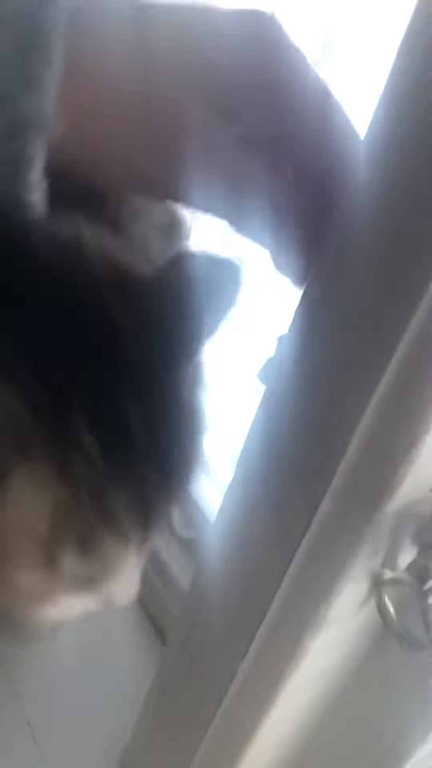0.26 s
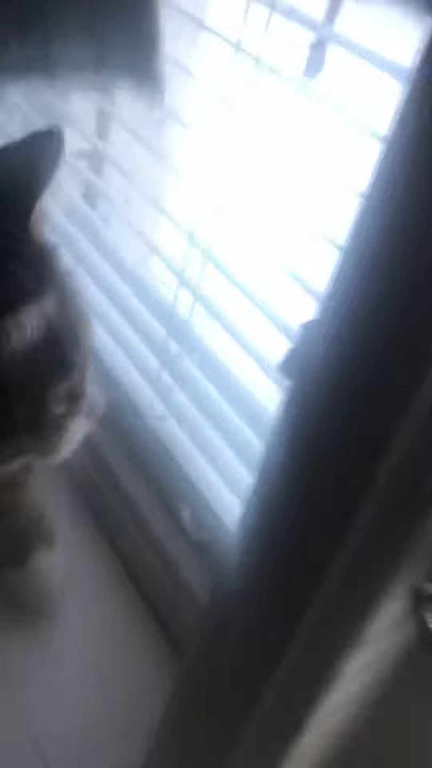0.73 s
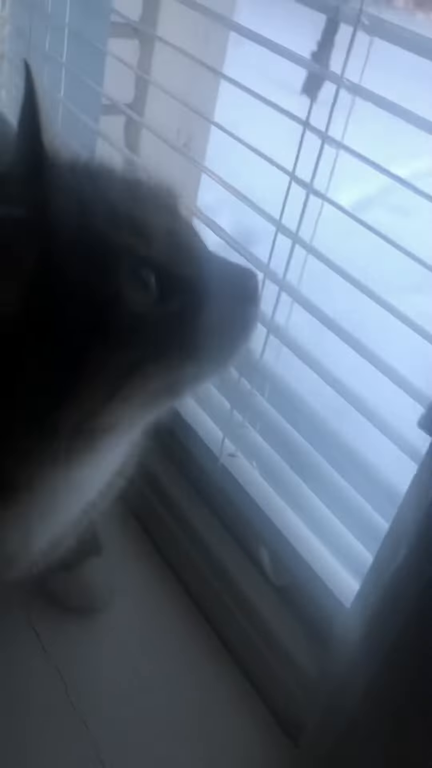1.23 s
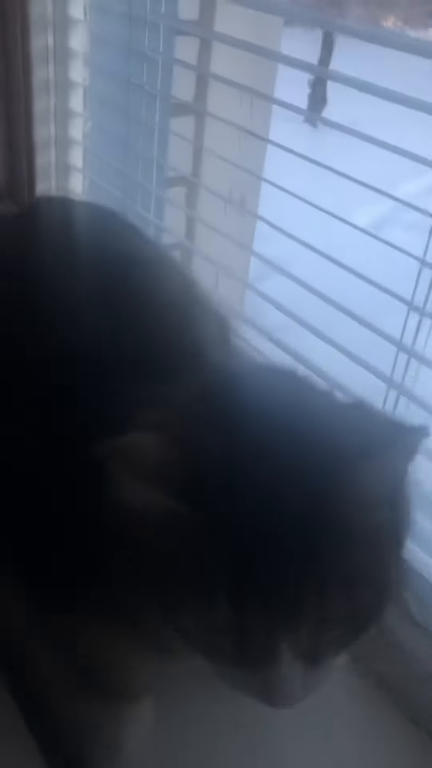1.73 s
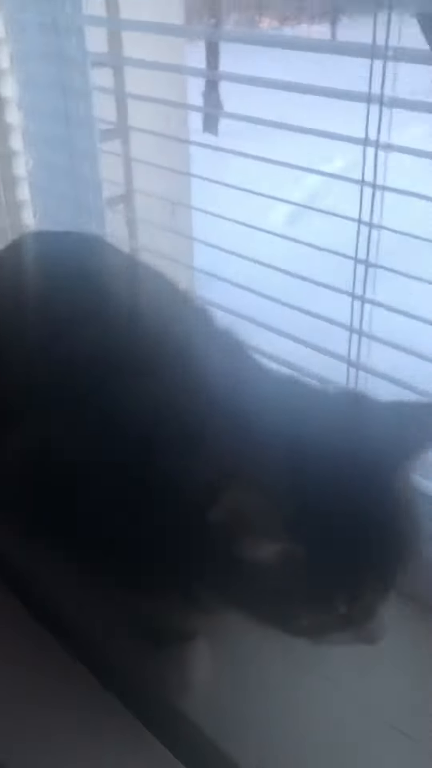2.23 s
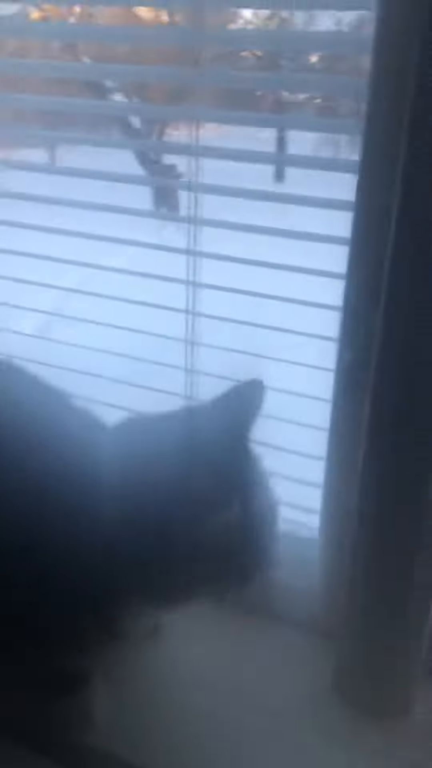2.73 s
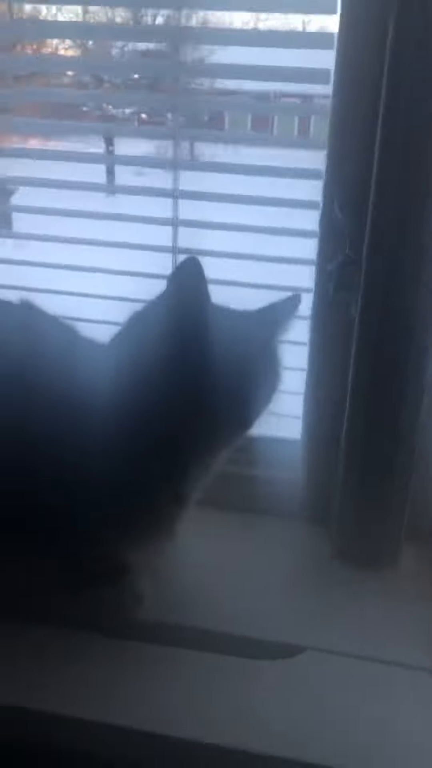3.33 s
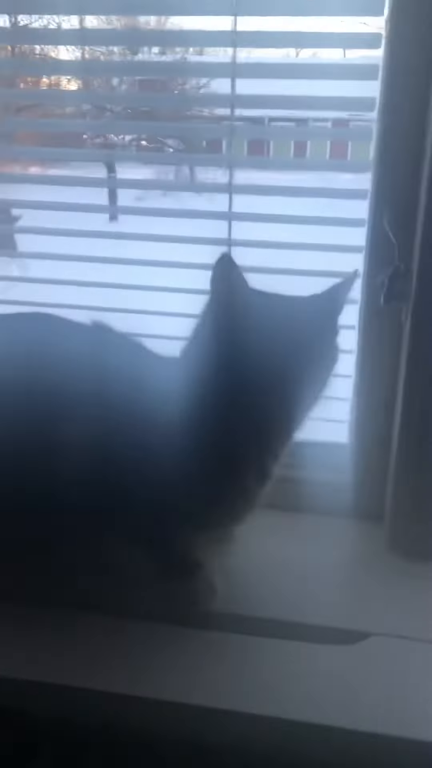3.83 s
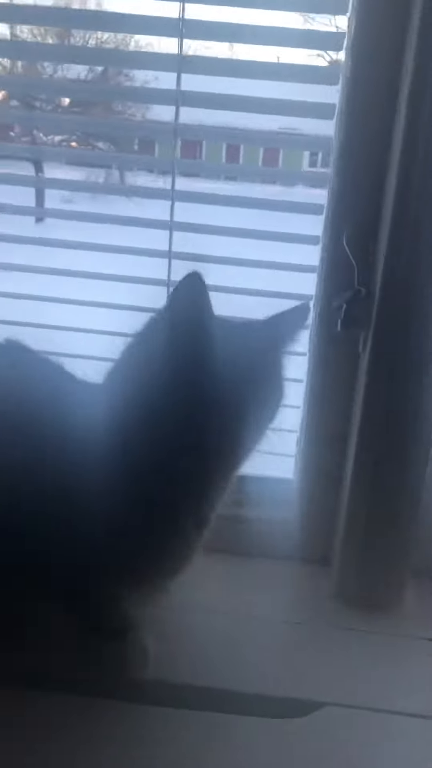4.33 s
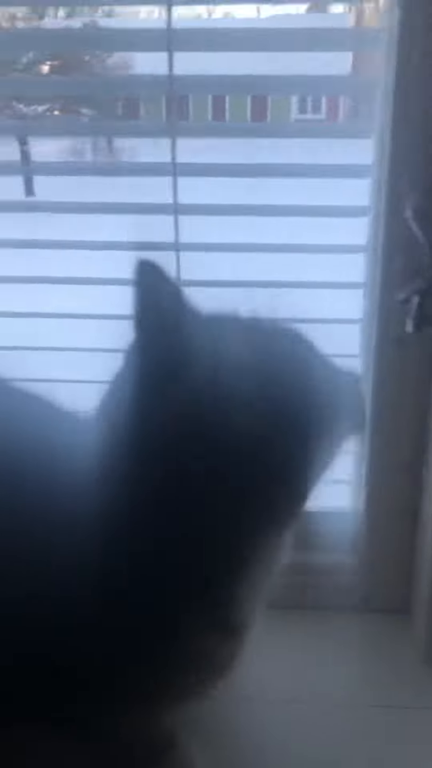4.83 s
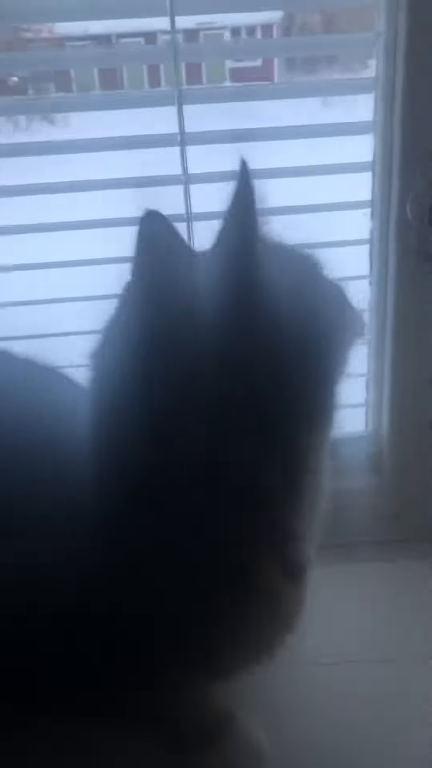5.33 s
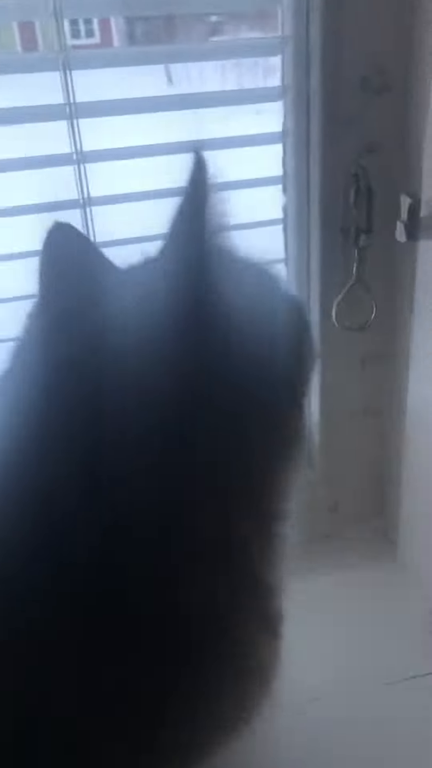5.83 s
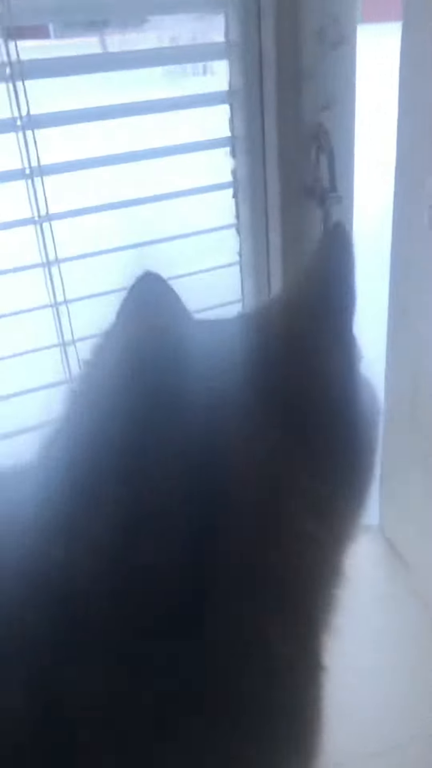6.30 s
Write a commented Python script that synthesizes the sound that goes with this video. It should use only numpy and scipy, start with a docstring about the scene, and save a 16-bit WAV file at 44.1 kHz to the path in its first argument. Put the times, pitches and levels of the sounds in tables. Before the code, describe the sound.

A window sash clacks shut with a metallic slat rattle, quiet fur rustles and small ticks follow, then a latch is worked loose with hard clattering knocks.

```python
"""A cat shifts on the sill of a window with slatted blinds, in a quiet room, close to a hand-held phone.
All along there are room hum and rustling fur and cloth, both made of shaped noise. At first the sash clacks
shut: noise bursts knock, loose slats rattle and the handle rings on as slowly fading tones. Small ticks and
dull, sagging thuds follow. From 5 s the metal latch is worked loose, with harder knocks, rattle, ringing
and a tiny squeak; then fur and cloth rustle again and soft thuds end it."""
import sys
import numpy as np
from scipy import signal
from scipy.fft import rfft, irfft
from scipy.io import wavfile
from scipy.ndimage import uniform_filter1d

SR = 44100
rng = np.random.default_rng(int(sys.argv[2]) if len(sys.argv) > 2 else 0)


def attenuation_scalar(level_db):
    """Turn a level in dB into a linear amplitude multiplier (20 dB per decade)."""
    decades = np.asarray(level_db, float) / 20
    return 10 ** decades


def bounce(signal):
    """Save signal as a 16-bit WAV file at the path given by the first command-line argument."""
    frames = np.transpose(np.atleast_2d(signal))
    limited = np.clip(frames, -1, 1)
    pcm = np.round(limited * 32767).astype(np.int16)
    wavfile.write(sys.argv[1], SR, pcm)


N = 289296  # length in samples
BINS = np.fft.rfftfreq(4096, 1 / SR)  # frequencies in Hz at which the knocked parts are described

# Knocks of latch, slats and claws. Each row: start in seconds, peak rms level of the slats in dB,
# main resonance in Hz, time to fade by 60 dB in seconds (.004 at least), treble against the slats in dB.
KNOCKS = [(0.1649, -44.5, 2460, .064, -12), (0.2681, -47.5, 3530, 0.023, -19.5),
          (0.2748, -36.5, 3300, 0.05, -29), (0.2915, -42.5, 2100, 0.076, -26),
          (0.3018, -43.5, 1020, 0.03, -25), (0.318, -51.5, 7800, .023, -24),
          (0.3975, -42.5, 3190, .059, -18.5), (0.411, -13.5, 3700, 0.023, -15),
          (0.4154, -23.5, 1770, 0.037, -26), (0.446, -24.5, 2908, 0.054, -18),
          (0.4749, -38, 3409, 0.11, -19), (0.5188, -39, 4230, 0.028, -40.5),
          (0.8119, -53, 1085, 0.079, -20.5), (0.9361, -60.5, 2980, 0.036, -13),
          (1.9744, -62, 3970, .072, -13), (2.0001, -57, 6080, .016, -9.5), (3.071, -64.5, 1064, 0.042, -25),
          (3.0949, -58.5, 2260, .0094, -3.5), (3.138, -51, 2760, 0.012, -11.5),
          (3.1957, -50, 2020, 0.0031, -27), (3.2926, -52.5, 4250, 0.0097, -10),
          (3.3, -58.5, 1400, .02, -19), (3.4262, -60, 1290, 0.02, -8), (3.568, -60, 1280, 0.031, -11),
          (3.738, -67, 1290, .077, -22), (4.5477, -55, 3550, 0.0044, -4), (5.018, -38, 3690, 0.062, -8.5),
          (5.029, -43, 1857, 0.062, 5.5), (5.0642, -31, 3300, 0.16, -11.5),
          (5.0709, -27.5, 2100, 0.0057, -1), (5.0767, -29, 1560, 0.0079, 4),
          (5.0878, -32, 2410, 0.058, -12), (5.0985, -33.5, 3980, 0.014, 2.5),
          (5.1114, -39, 3630, 0.086, -2.5), (5.1372, -33.5, 3120, 0.047, -6.5),
          (5.1592, -28, 7700, 0.037, -5), (5.1886, -22, 965, 0.062, -3.5),
          (5.2149, -24.5, 1000, 0.045, -14), (5.2233, -28.5, 1084, .026, -6),
          (5.2425, -38, 1019, 0.026, 1.5), (5.3146, -24, 7400, 0.024, 1), (5.3284, -48, 4125, 0.035, -2),
          (5.3707, -36.5, 7600, .015, -7.5), (5.3947, -27, 7540, 0.02, -3.5), (5.3983, -30, 5400, 0.02, -1),
          (5.4254, -31, 7610, 0.017, -4), (5.435, -13, 5860, 0.016, -9.5), (5.4392, -19, 8550, 0.042, -1),
          (5.4526, -26, 7545, 0.11, -0.5), (5.4652, -30, 3940, 0.047, -1), (5.4805, -27.5, 7460, 0.043, -2),
          (5.4957, -59.5, 4046, 0.04, -6.5), (5.623, -51.5, 980, 0.028, -30.5),
          (5.637, -47.5, 990, 0.0093, -15), (5.6643, -36, 1070, 0.04, -24),
          (5.6757, -53, 1130, .056, -28.5)]


def evened(x):
    """Scales a sound to rms 1, so that its level can be set afterwards."""
    return x / np.sqrt(np.mean(x ** 2) + 1e-20)


def read(points, hz):
    """Reads a table of (Hz, value) at the frequencies hz, along a logarithmic frequency scale."""
    f, value = np.transpose(points)
    return np.interp(np.log(hz + 1), np.log(f), value)


def add(mix, s, sound):
    """Mixes a sound in at s seconds, cutting off what runs past the end."""
    part = mix[round(s * SR):][:len(sound)]
    part += sound[:len(part)]


def noise(spectrum, patchy_db, flicker_db):
    """Noise of rms 1 with drifting louder patches and a flicker shared by all frequencies."""
    frames = N // 128 + 5
    real, imaginary, patches = rng.standard_normal((frames, 257, 3)).T
    patches = uniform_filter1d(patches, size=10, axis=0)  # spread over frequency
    patches = evened(uniform_filter1d(patches, size=20, axis=1))  # spread over time
    flicker = evened(uniform_filter1d(rng.standard_normal(frames), size=4))
    cells = (real + 1j * imaginary) * attenuation_scalar(patchy_db * patches + flicker_db * flicker)
    white = signal.istft(cells, nperseg=512, noverlap=384)[1][:N]
    color = attenuation_scalar(read(spectrum, np.fft.rfftfreq(N, 1 / SR)))
    return evened(irfft(rfft(white) * color, N))


def room_tone():
    """The steady hum of the room: faint noise, strongest in the bass."""
    # Spectrum of the hum. Each row: frequency in Hz, relative level in dB.
    hum = [(18, -36.5), (30, -8.5), (60, 0), (166, 1), (247, -12), (289, -7.5), (787, -14.5), (11600, -30),
           (15100, -28), (16300, -39)]
    return attenuation_scalar(-68) * noise(hum, patchy_db=1.2, flicker_db=0.5)


def stir():
    """Fur, cloth and hand rub as rumble, rustle and fine hiss; each stroke swells and fades."""
    # Movement near the phone. Each row: time in seconds, rumble rms in dB, rustle rms in dB
    # (strokes are added on top).
    movement = [(0, -60, -65.5), (.09, -61, -70.5), (.55, -52, -61.5), (.8, -65, -68.5),
                (1.051, -68, -79.5), (1.92, -73, -82.5), (2.1, -63, -67), (2.45, -74, -71),
                (2.9, -66.5, -67), (3.039, -66, -79), (3.2, -64.5, -72.5), (3.45, -66.5, -79),
                (3.9, -69.5, -69), (4.3, -80, -78.5), (4.781, -71.5, -80), (4.86, -48.5, -70.5),
                (4.93, -59.5, -67), (5.049, -55, -63), (5.72, -48, -55), (5.9, -50, -60.5), (6.1, -60, -70),
                (6.3, -60, -79), (6.56, -68, -77)]
    # Single strokes. Each row: start in seconds, length in seconds, rustle rms in dB before a cut of 6 dB,
    # fine hiss rms in dB.
    strokes = [(0.081, 0.097, -61.5, -67.5), (0.224, 0.055, -82, -65), (0.342, 0.075, -68, -62),
               (0.556, 0.14, -84, -65.5), (0.651, 0.19, -67.5, -66), (0.826, 0.16, -68.5, -78.5),
               (1.931, 0.13, -65.5, -73), (2.479, 0.14, -61.5, -98), (2.65, 0.15, -66, -76.5),
               (2.9, 0.056, -72, -80.5), (3.11, .13, -60, -68.5), (3.254, 0.072, -69.5, -79.5),
               (3.554, 0.1, -73.5, -82), (3.707, 0.088, -74, -76), (3.838, 0.071, -68, -74.5),
               (4.151, 0.097, -65, -85.5), (4.633, 0.26, -81.5, -77), (4.814, 0.069, -59, -84),
               (5.7, 0.51, -72, -74.5), (6.321, 0.17, -67, -97)]
    # Spectra of the three noises. Each row: frequency in Hz, relative level in dB.
    rumble_color = [(30, -43), (55, -3.5), (100, -5.5), (160, -0.5), (300, -5.5), (500, -17), (1000, -37.5),
                    (2000, -46.5)]
    rustle_color = [(100, -20), (400, 8), (1000, -3), (3000, -8), (6000, -13), (12000, -26.5), (16000, -33)]
    hiss_color = [(2000, -31.5), (6000, -1), (10000, -6), (15500, -2.5), (16300, -1)]

    s, *levels_db = np.transpose(movement)
    rumble, rustle = (attenuation_scalar(np.interp(np.arange(N) / SR, s, db)) for db in levels_db)
    hiss = np.full(N, attenuation_scalar(-86))  # never quite silent
    for start, length, rustle_db, hiss_db in strokes:
        swell = signal.windows.tukey(round(length * SR), .7)
        add(rustle, start, attenuation_scalar(rustle_db - 6) * swell)
        add(hiss, start, attenuation_scalar(hiss_db) * swell)
    return (rumble * noise(rumble_color, 0.84, 0.83)
            + rustle * noise(rustle_color, 4.2, 1.8)
            + hiss * noise(hiss_color, 1.5, 2.0))


def causal(gain):
    """The impulse response with this gain per frequency that starts at once (minimum phase)."""
    log_gain = np.log(np.r_[gain, gain[-2:0:-1]] + 1e-5)
    return np.fft.ifft(np.exp(np.conj(signal.hilbert(log_gain)))).real[:2048]


def band(lo_hz, hi_hz):
    """Gain of a band-pass with steep sides."""
    return 1 / np.sqrt((1 + (lo_hz / (BINS + 1)) ** 8) * (1 + (BINS / hi_hz) ** 8))


def peaks(modes, reach=1):
    """Gain of resonant peaks over a flat response; reach says how well a blow finds each mode."""
    total_db = 0
    for (hz, width, _), height_db in zip(modes, np.transpose(modes)[2] * reach):
        total_db = total_db + height_db / (1 + ((BINS - hz) / (abs(width) / 2)) ** 2)
    return attenuation_scalar(total_db)


def bodies(main_hz, treble_db=-8):
    """Impulse responses of the slats (one patch loudest), of the hollow sash and of the bright edges."""
    # What rings in the slats and edges. Each row: frequency in Hz, width in Hz, height in dB at a reach of 1.
    slat_modes = [(1814.5, 60, 7.5), (2270, 110, 7), (2920, 130, 1), (3816, 150, 7.5), (4200, 35, 6),
                  (5610, 95, 6.5), (6310, 100, 8), (7600, 150, 8), (8420, 300, 5.5), (12350, 230, 6)]
    # Hollow modes of the sash and pane. Each row: frequency in Hz, width in Hz, height in dB.
    sash_modes = [(161.8, 18, 5.5), (289, 99, 7.5), (424.3, 75, 7.5), (591.5, 180, 6), (1140, 130, 2)]

    patch = 0.25 + 1 / np.hypot(1, (BINS - main_hz) / (0.11 * main_hz))
    near = 1 / np.hypot(1, (np.transpose(slat_modes)[0] - main_hz) / (0.1 * main_hz))
    reach = rng.random(len(slat_modes)) + 0.58 * near  # every blow lands on another spot
    metal = peaks(slat_modes, reach)
    blunt = np.hypot(1, BINS / (main_hz + 11000 * attenuation_scalar(treble_db)))  # a blunt blow is dull
    slats = band(800, 7500) * patch * metal / blunt
    sash = band(91, 1000) * peaks(sash_modes)
    edges = band(6800, 17000) * metal
    return causal(slats), causal(sash), causal(edges)


def rattle():
    """Small uneven contacts wander over the slats after each knock, while the heavy sash shudders."""
    # Shudder of the sash in its frame: one list while it is shut, one while it is opened.
    # Each row: time in seconds, rms level in dB.
    shudder = [
        [(.16, -48), (.19, -50), (.25, -68), (.3, -48.5), (.39, -64), (.435, -46), (.5, -51.5), (.6, -68)],
        [(5.012, -60.5), (5.06, -56), (5.095, -42.5), (5.15, -52.5), (5.235, -33.5), (5.305, -48.5),
         (5.345, -35), (5.39, -56), (5.45, -33.5), (5.52, -45), (5.6, -68), (5.655, -70), (5.68, -41.5),
         (5.8, -60), (5.92, -71)],
    ]
    # Chatter of loose slats after a knock of -40 dB, and its growth in dB for each dB of the knock.
    chatter_db, growth = -52.5, 0.7349
    rise_s, slat_t60, edge_t60 = 0.0055, 0.21, 0.13  # seconds; the treble settles sooner

    t = np.arange(N) / SR
    # The rattle is heard only within the two spans of the shudder.
    moving = sum(1. * (t > span[0][0]) * (t <= span[-1][0]) for span in shudder)
    moving = uniform_filter1d(moving, size=800)

    after = t[:SR // 2]
    rise = np.minimum(after / rise_s, 1)
    slat_settle = (rise * attenuation_scalar(-60 * after / slat_t60)) ** 2
    edge_settle = (rise * attenuation_scalar(-60 * after / edge_t60)) ** 2
    dull, bright = np.zeros((2, N))  # power of the chatter
    for s, db, _, _, treble_db in KNOCKS:
        power = attenuation_scalar(chatter_db + growth * (db + 40)) ** 2
        add(dull, s, slat_settle * power)
        add(bright, s, edge_settle * power * attenuation_scalar(treble_db) ** 2)

    size = attenuation_scalar(2.5 * np.minimum(rng.exponential(1, N), 3))
    taps = rng.standard_normal(N) * (rng.random(N) < 1800 / SR) * size  # about 1800 a second
    # A group of slats is picked afresh about every 14 ms.
    spot = np.repeat(rng.integers(0, 5, N // 600 + 1), 600)[:N]
    slats, edges = np.zeros((2, N))
    for k, hz in enumerate([1820, 2462, 3420, 4096, 5400]):
        body, boom, edge = bodies(hz)
        slats += evened(signal.oaconvolve(taps * (spot == k), body)[:N])
        edges += evened(signal.oaconvolve(taps * (spot == k), edge)[:N])
    sash = evened(signal.oaconvolve(rng.standard_normal(N), boom)[:N])
    chatter = np.sqrt(dull) * evened(slats) + np.sqrt(bright) * evened(edges)
    shudder_level = attenuation_scalar(np.interp(t, *np.concatenate(shudder).T))
    return moving * (chatter + shudder_level * sash)


def knocks():
    """Each knock is a short burst of scraping contact; the heavy sash swells later and booms longer."""
    out, t = np.zeros(N), np.arange(8192) / SR
    for s, db, hz, t60, treble_db in KNOCKS:
        # Harder and higher knocks move the sash relatively less.
        boom_db = -8.5 - 0.34 * (db + 40) - 3 * np.log2(hz / 2000)
        t60 = max(t60, .004)
        sharp = attenuation_scalar(-60 * t / t60) * np.minimum(t / 0.00057, 1)
        heavy = attenuation_scalar(-60 * t / (t60 + 0.08)) * np.minimum(t / 0.0018, 1)
        grit = rng.standard_normal((3, len(t)))
        slat_body, sash_body, edge_body = bodies(hz, treble_db)
        slats = signal.fftconvolve(grit[0] * sharp, slat_body)
        sash = signal.fftconvolve(grit[1] * heavy, sash_body)
        edges = signal.fftconvolve(grit[2] * sharp, edge_body)
        slats /= np.sqrt(np.max(uniform_filter1d(slats ** 2, size=66)))  # loudest 1.5 ms at rms 1
        loud = np.std(slats[:441])  # over the first 10 ms
        sash *= attenuation_scalar(boom_db) * loud / np.std(sash[:882])
        edges *= attenuation_scalar(treble_db) * loud / np.std(edges[:441])
        add(out, s, attenuation_scalar(db) * (slats + sash + edges))
    return out


def handle():
    """Modes of the metal handle: a blow resets how strongly one rings; it dies freely until a touch damps it."""
    # Modes as pairs that beat. Each row: frequency in Hz, time to fade by 60 dB in seconds, distance of
    # the partner in Hz, strength of the partner as a share, time in seconds when the pair is in step.
    modes = [(6490, 1.5, 20, .05, .45), (9128, .75, -9, .5, 5.6), (10488, .4, 9, .15, 5.5),
             (12380, .12, 30, .1, 5.07), (15092, .7, 14, .4, 5.605), (3862, .3, 25, .2, .41),
             (4080, .3, 30, .2, 5.14), (7682, .4, 20, .2, .45)]
    # Blows, one list for each mode. Each row: time in seconds, rms level in dB without the partner,
    # seconds until a touch damps it.
    rings = [
        [(.411, -35, 0.11), (5.078, -36, 0.011), (5.125, -51, 0.028), (5.188, -48.5, 0.065),
         (5.315, -39, 0.016), (5.43, -51, 0.039)],
        [(.411, -45, 0.061), (5.078, -54, .03), (5.205, -48, 0.035), (5.315, -50.5, 0.17), (5.427, -49, .035),
         (5.465, -47, .42)],
        [(.305, -69, .1), (.411, -45, 0.0089), (.424, -61.5, 0.11), (5.078, -49, 0.033), (5.125, -39, 0.1),
         (5.188, -34.5, .017), (5.315, -49, 0.075), (5.427, -38, 0.03), (5.49, -47, .2)],
        [(.398, -54.5, .012), (5.066, -33, 0.015), (5.098, -40, .03), (5.437, -27, 0.033)],
        [(.277, -65, .1), (.398, -51, .045), (.446, -53.5, 0.072), (5.078, -44, 0.11), (5.188, -28, .035),
         (5.23, -41, 0.073), (5.315, -48, 0.11), (5.425, -48, .012), (5.465, -46, .31)],
        [(.278, -57, 0.055), (.411, -35.5, 0.049), (5.08, -44, 0.035), (5.19, -43, 0.025), (5.33, -50, 0.054)],
        [(.447, -43.5, 0.041), (5.1, -48.5, 0.027), (5.138, -44, 0.055), (5.466, -41, 0.035)],
        [(.29, -69, .04), (.43, -53, 0.06), (5.1, -51, .05), (5.16, -44, 0.026), (5.44, -45, .05)],
    ]
    touch_t60 = 0.04916  # seconds

    t, out = np.arange(N) / SR, np.zeros(N)
    for (hz, t60, split_hz, share, step_s), blows in zip(modes, rings):
        s, db, free = np.transpose(blows)
        last = np.searchsorted(s, t) - 1  # the latest blow; -1 before the first
        since = t - s[last]
        touched = np.maximum(since - free[last], 0)
        loss_db = 60 * (since / t60 + touched / touch_t60)
        level = attenuation_scalar(db[last] - abs(loss_db)) * (last >= 0)
        level = uniform_filter1d(level, size=160)  # no clicks at the blows
        pair = 1 + share * np.exp(2j * np.pi * split_hz * (t - step_s))
        tone = np.exp(2j * np.pi * (hz * t + rng.random()))
        out += np.sqrt(2) * level * (pair * tone).real
    return out


def thuds():
    """A soft push rings one low mode whose pitch sags."""
    # Dull thuds of sash, paws and grip. Each row: start in seconds, level in dB from which it fades,
    # first pitch in Hz, time to fade by 60 dB in seconds (.01 at least), share of the pitch that sags away.
    pushes = [(0.413, -39, 241.3, 0.48, 0.053), (0.816, -44, 462, 0.044, 0.1),
              (5.667, -39.5, 366, 0.12, 0.075), (0.969, -52.5, 150, 0.082, 0.096),
              (1.012, -48, 128, 0.068, 0.15), (1.327, -46.5, 199, .03, .3),
              (1.363, -46.5, 128.7, 0.078, 0.29), (1.635, -51, 130.3, 0.098, 0.14),
              (2.116, -57, 189.4, 0.075, 0.091), (2.527, -41, 203, 0.022, 0.28),
              (3.143, -35, 473, 0.024, 0.58), (3.2035, -36.5, 482, 0.08, 0.88),
              (3.3017, -35.5, 525, 0.022, 0.54), (3.616, -45, 261, 0.022, 0.15),
              (3.754, -52.5, 202.4, 0.08, 0.28), (4.696, -49, 171, 0.075, 0.1),
              (6.21, -45.5, 276.5, 0.073, 0.14), (6.517, -48, 209, 0.094, 0.058)]
    out, t = np.zeros(N), np.arange(6000) / SR
    for s, db, hz, t60, sag in pushes:
        turns = hz * ((1 - sag) * t + sag * .004 * (1 - np.exp(-t / .004)))  # sags within some 4 ms
        fade = attenuation_scalar(db - 60 * t / max(t60, .01))
        onset = np.minimum(t * hz * 3, 1)  # a third of a cycle
        add(out, s, fade * onset * np.sin(2 * np.pi * turns))
    return out


def squeak():
    """Metal slides on metal: a short stick-slip tone with overtones and an unsteady pitch."""
    # One row: start in seconds, length in seconds, pitch from Hz, to Hz (before the wobble),
    # peak level of the lowest tone in dB.
    slide = (5.283, .027, 4150, 4550, -43)
    s, length, from_hz, to_hz, db = slide
    count = round(length * SR)
    wobble = evened(uniform_filter1d(rng.standard_normal(count), size=20))
    turns = np.cumsum(np.linspace(from_hz, to_hz, count) * (1 + .05 * wobble)) / SR
    tone = sum(0.82 ** k * np.sin(2 * np.pi * (k + 1) * turns) for k in range(3))
    out = np.zeros(N)
    add(out, s, attenuation_scalar(db) * np.hanning(count) * tone)
    return out


def room(x):
    """The echo of the room: sparse taps of random sign, each band dying at its own speed."""
    # Each row: frequency in Hz, time to fade by 60 dB in seconds.
    echo = [(200, 0.42), (1000, 0.23), (4000, 0.23), (12000, 0.18)]
    taps = np.zeros(SR // 2)
    at = np.arange(200, len(taps) - 20, 20)
    taps[at + rng.integers(0, 20, len(at))] = rng.choice([-1., 1.], len(at))
    hz, t, cells = signal.stft(taps, SR, nperseg=256)
    t60 = np.maximum(read(echo, hz), .02)[:, None]
    tail = signal.istft(cells * attenuation_scalar(-60 * t / t60), SR, nperseg=256)[1]
    return signal.fftconvolve(x, tail / np.linalg.norm(tail))[:N]


def scene():
    """Adds up the window sounds with their echo, the ringing handle, the stirring and the room tone."""
    window = knocks() + rattle() + squeak() + thuds()
    mix = window + attenuation_scalar(-19) * room(window) + handle() + stir() + room_tone()
    return mix[None]


def band_limit(x):
    """A steep low-pass at the top of the band."""
    return signal.sosfilt(signal.butter(12, 16810, fs=SR, output="sos"), x)


def record(dry):
    """Little of the treble is heard above an edge near 15.8 kHz."""
    edge_hz = 15800
    shelf = signal.firwin2(511, [0, edge_hz - 150, edge_hz + 150, SR / 2], [1, 1, .05, .02], fs=SR)
    heard = signal.oaconvolve(dry, shelf[None], "same")
    return band_limit(heard)


dry = scene()
out = record(dry)
bounce(out)
```